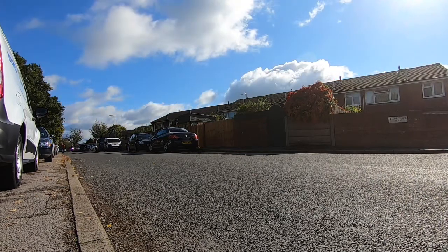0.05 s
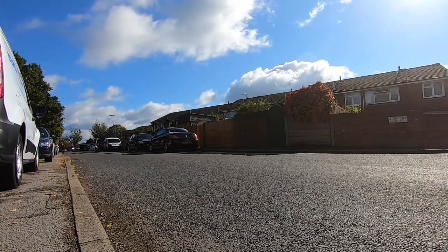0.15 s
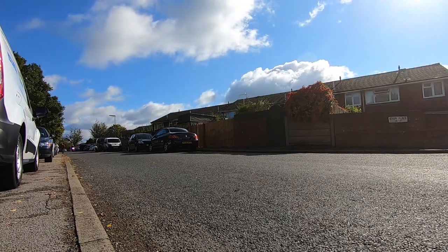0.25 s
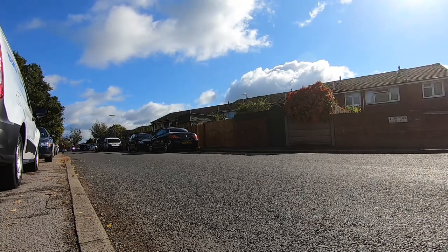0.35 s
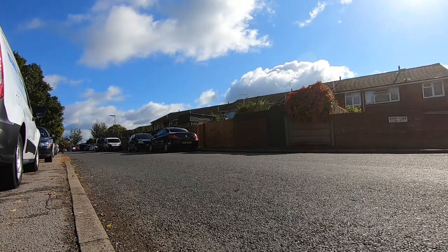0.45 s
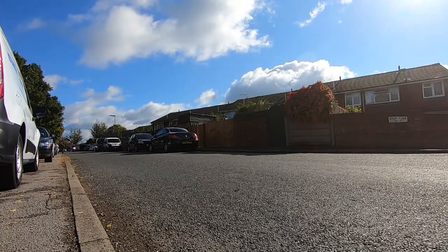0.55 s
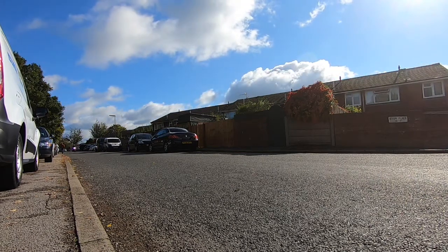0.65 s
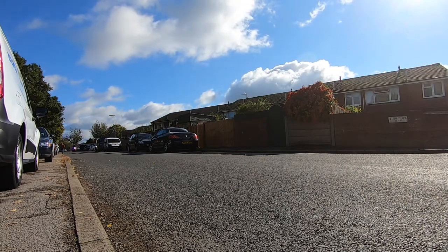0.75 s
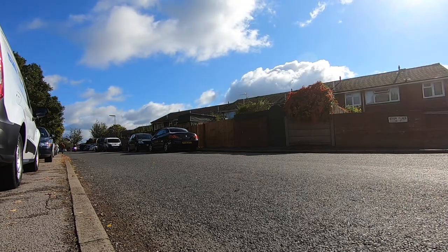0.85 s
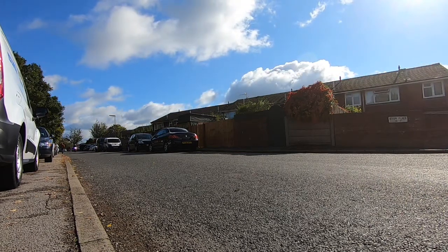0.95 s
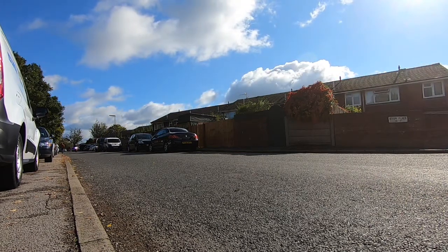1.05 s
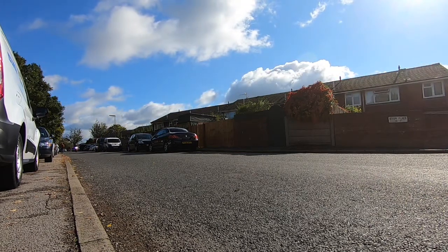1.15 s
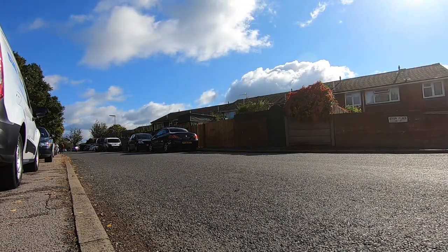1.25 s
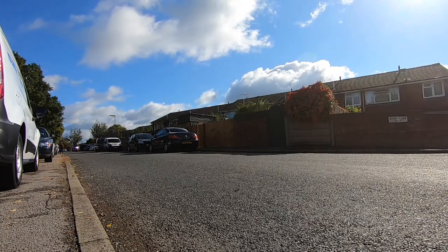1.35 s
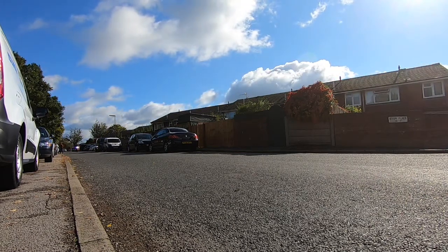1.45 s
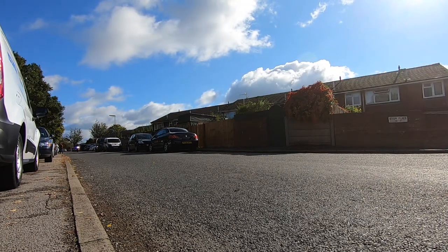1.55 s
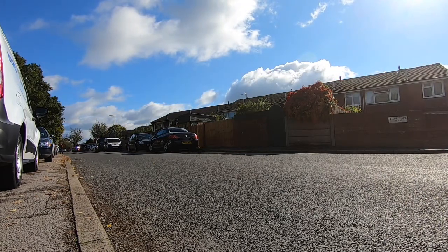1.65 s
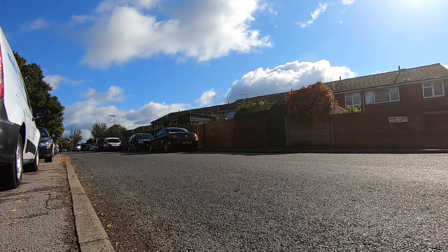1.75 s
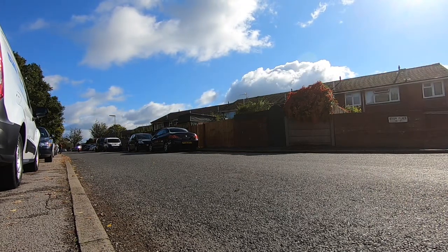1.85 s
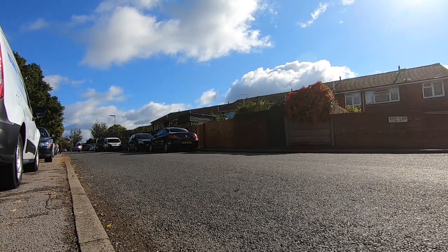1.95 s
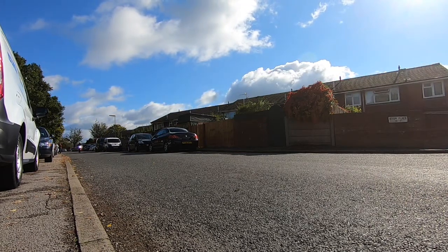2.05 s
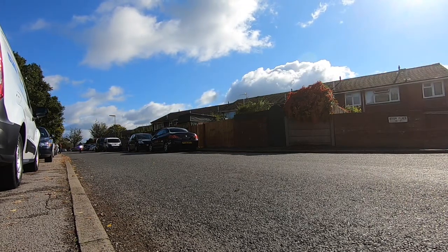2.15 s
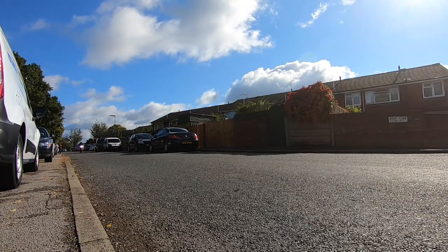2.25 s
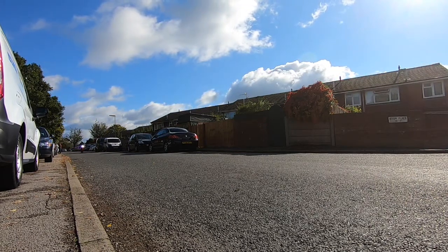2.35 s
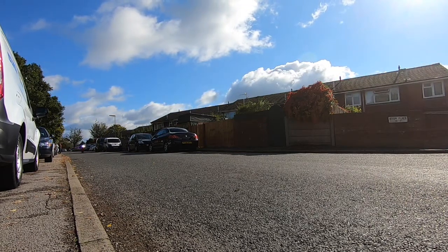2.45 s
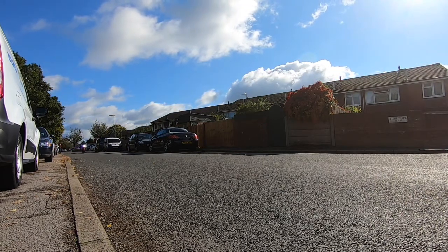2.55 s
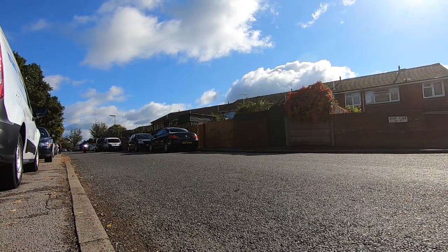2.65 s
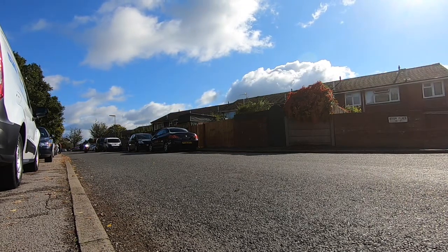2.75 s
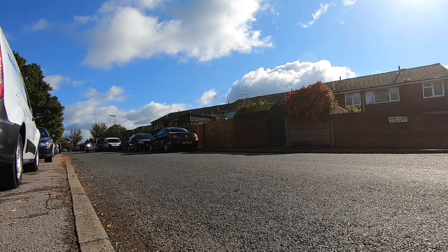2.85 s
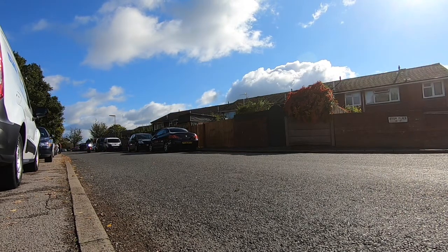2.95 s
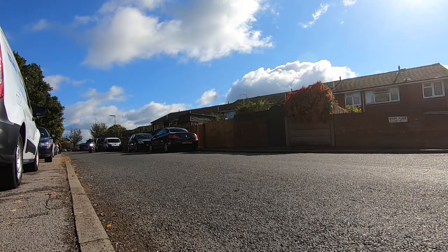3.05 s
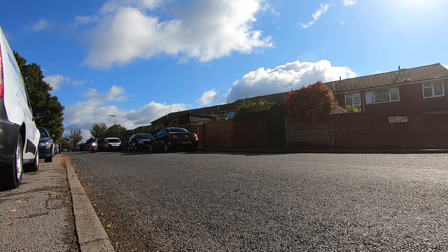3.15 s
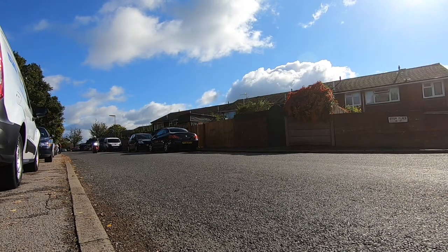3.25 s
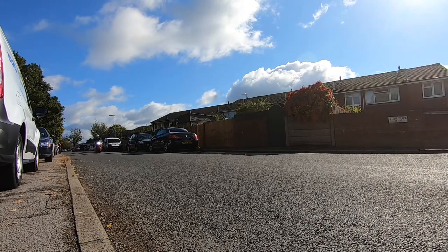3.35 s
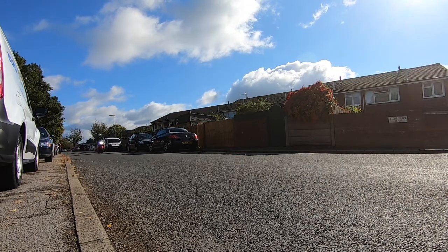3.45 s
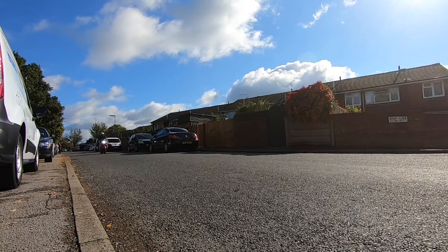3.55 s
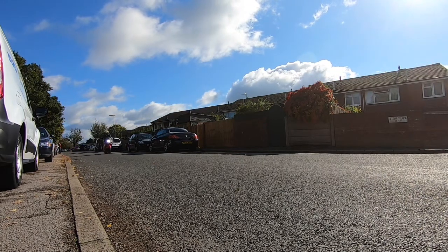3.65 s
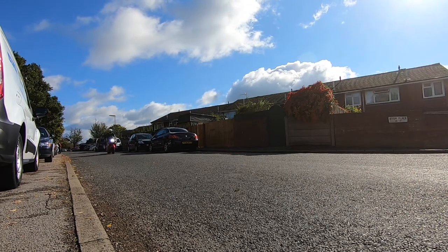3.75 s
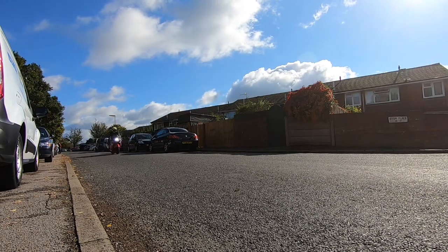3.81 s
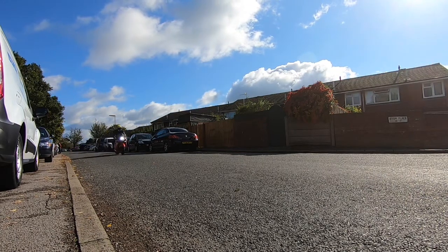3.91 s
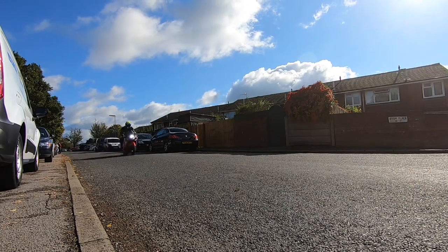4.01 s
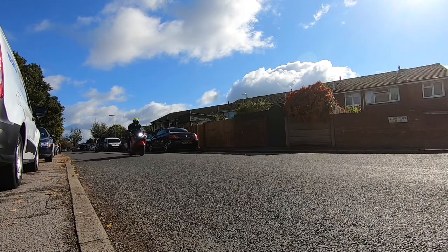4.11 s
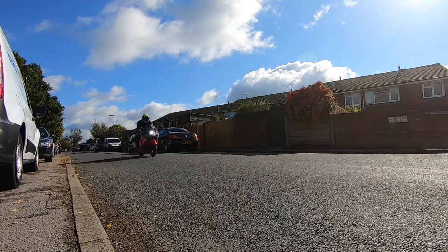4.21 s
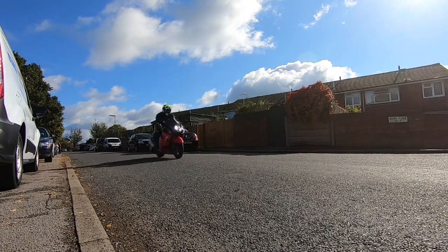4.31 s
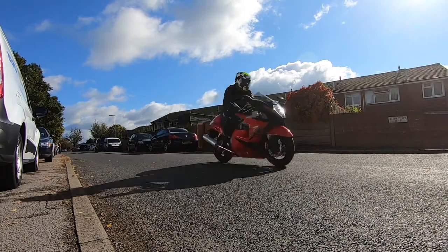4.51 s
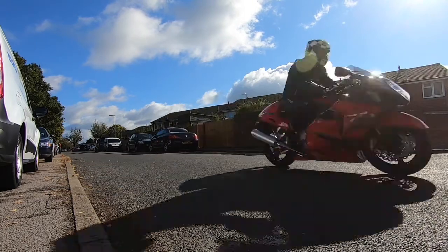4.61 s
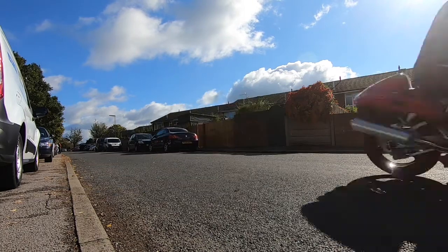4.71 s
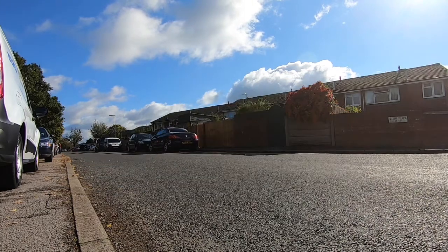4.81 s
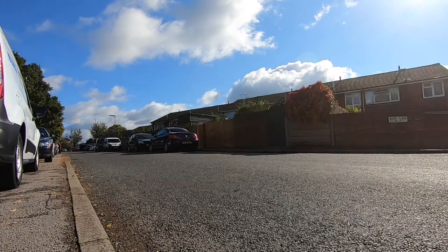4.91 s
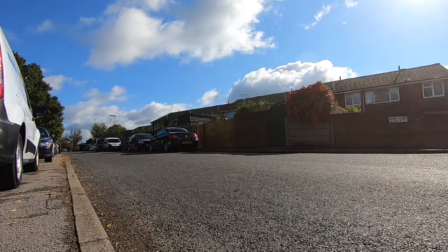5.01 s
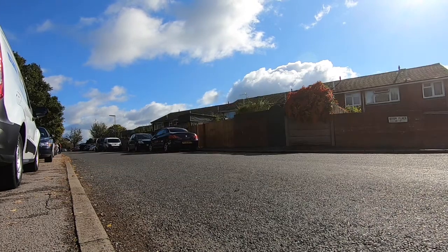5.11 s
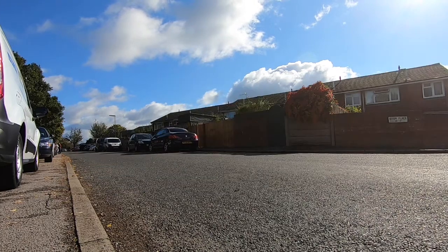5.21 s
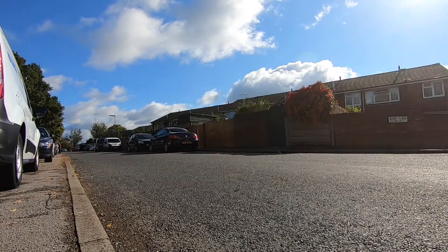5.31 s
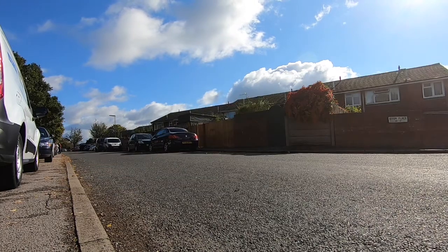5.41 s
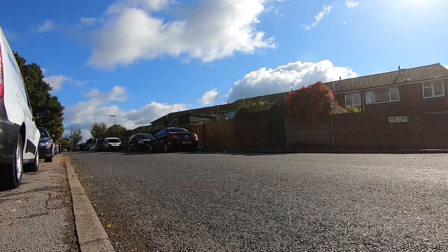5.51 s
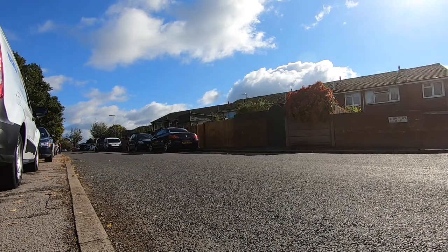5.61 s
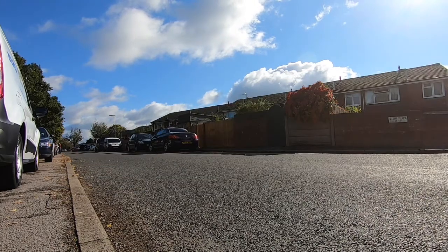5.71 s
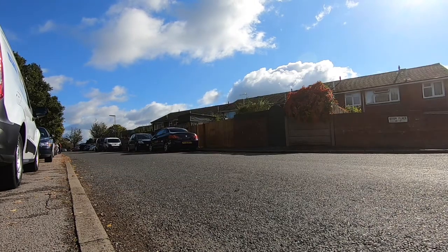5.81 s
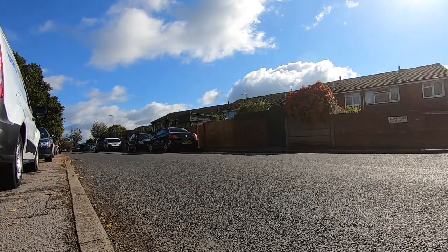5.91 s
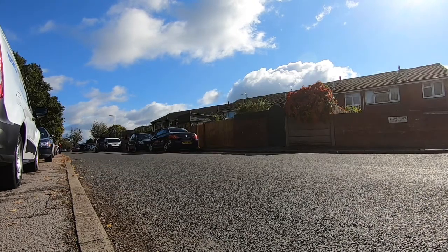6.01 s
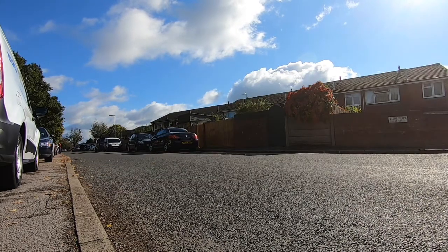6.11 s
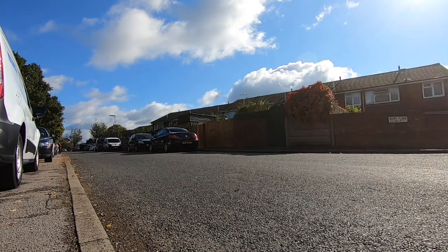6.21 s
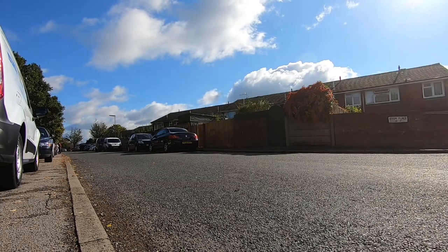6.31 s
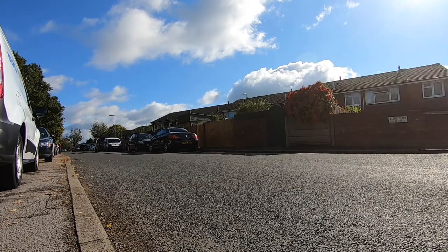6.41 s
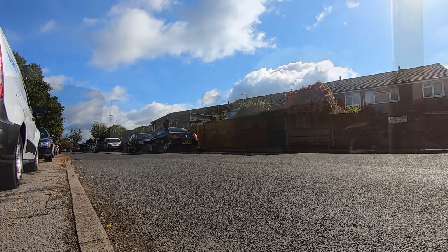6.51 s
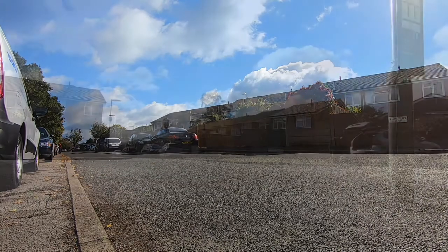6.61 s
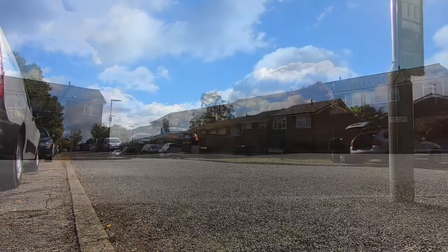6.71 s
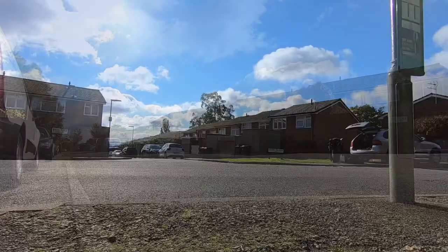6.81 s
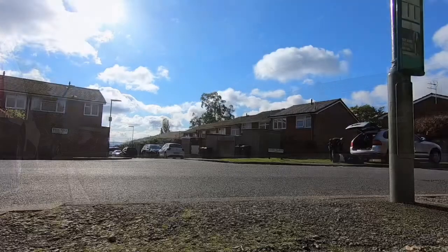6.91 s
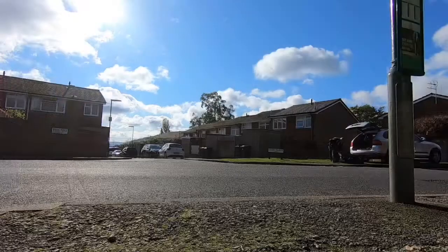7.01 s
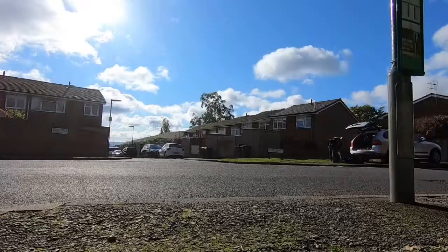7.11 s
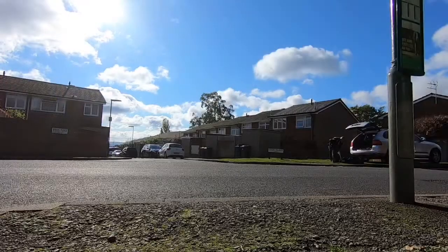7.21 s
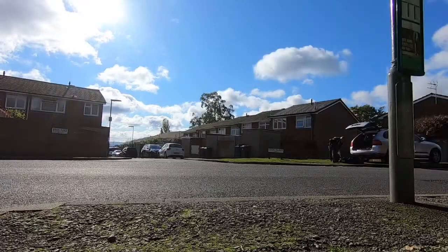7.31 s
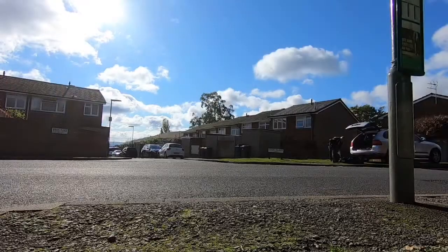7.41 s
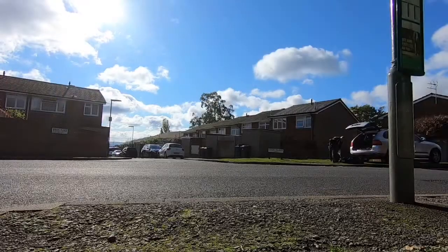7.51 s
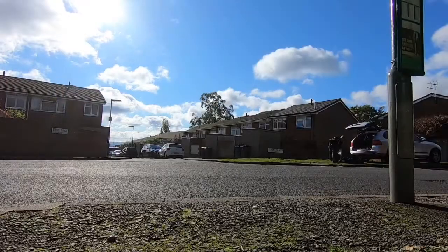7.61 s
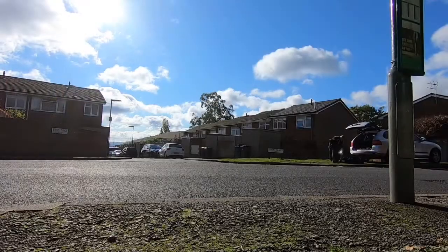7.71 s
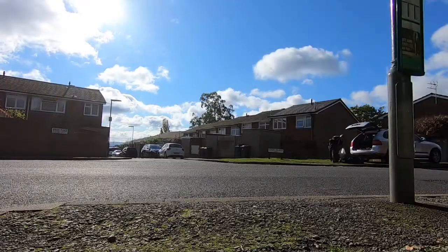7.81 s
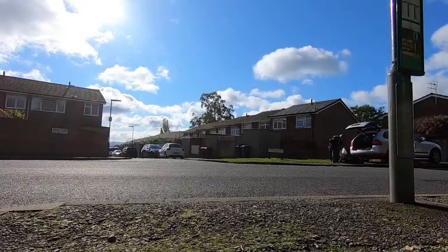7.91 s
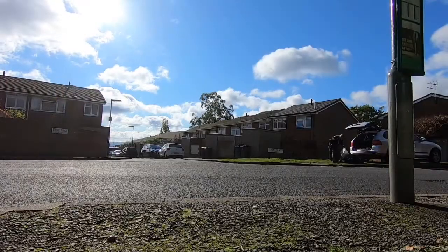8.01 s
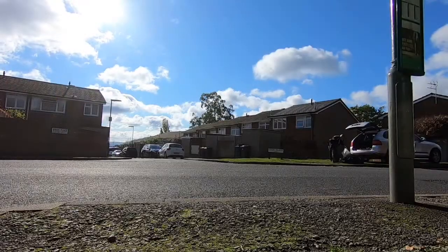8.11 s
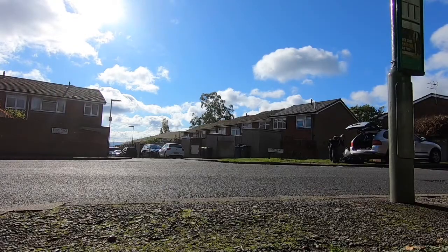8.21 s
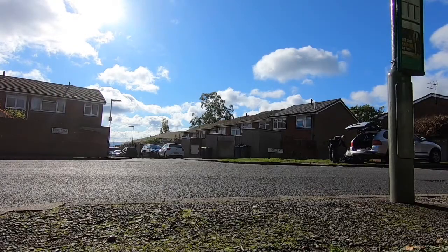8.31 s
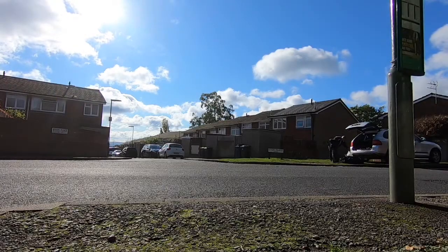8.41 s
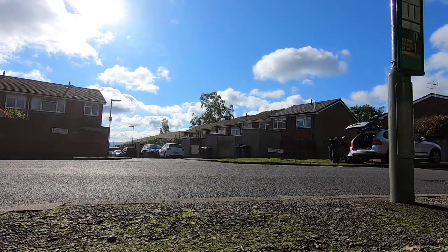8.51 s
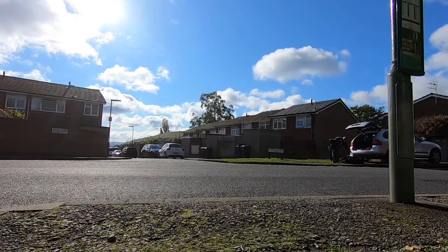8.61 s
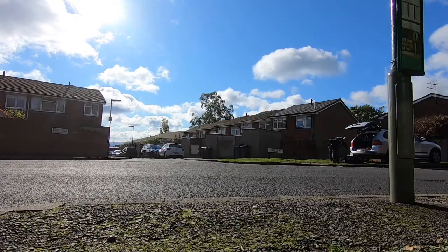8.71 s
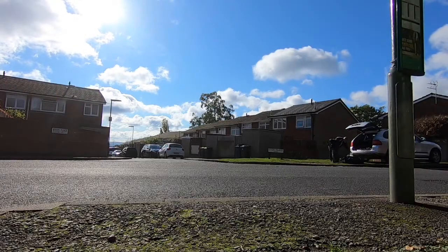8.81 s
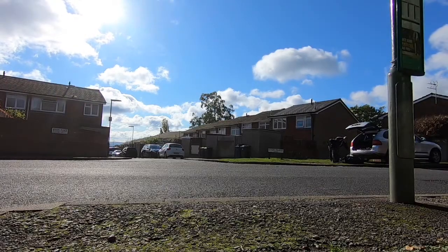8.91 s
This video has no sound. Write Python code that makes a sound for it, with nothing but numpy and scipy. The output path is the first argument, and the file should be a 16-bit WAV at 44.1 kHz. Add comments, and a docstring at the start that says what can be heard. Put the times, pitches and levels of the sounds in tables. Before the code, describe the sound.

Distant motorcycle drone builds to a loud close pass with falling pitch and low exhaust pops, then fades into a slow, thumping idle coming closer.

```python
"""A four-cylinder motorcycle pulls up a residential street: engine multiples, roar noise and pipe rings
build with its drone, over filtered-noise town murmur, a faint fading hum and wind on the microphone ports.
It passes the kerb with falling Doppler pitch and coasts away, throttle shut, the pipe popping as short low rings.
A dissolve leads to a second, quieter spot, where the bike rolls nearer at a lumpy idle: pressure pulses
ring the silencer, over engine hiss and casing rings."""
import sys
import numpy as np
from scipy import signal
from scipy.fft import rfft, irfft
from scipy.io import wavfile
from scipy.ndimage import uniform_filter1d, map_coordinates

SR = 44100
rng = np.random.default_rng(int(sys.argv[2]) if len(sys.argv) > 2 else 0)


def transcribe(u):
    """Save the signal u as a 16-bit wav file named by the first command-line argument.

    u: samples, shape (n,) or (channels, n), limited to [-1, 1]; the rate is SR.
    q: integer samples, one column per channel.
    """
    v = np.clip(np.atleast_2d(u).T, -1, 1)
    q = np.round(v * 32767).astype(np.int16)
    wavfile.write(sys.argv[1], SR, q)


N = 394694

# exhaust drone, swelling and dipping as street reflections add and cancel: (time [s], rms level [dB])
DRONE_LEVEL = [(0, -37.5), (.83, -41.5), (1.02, -35), (1.23, -53), (1.56, -32), (1.86, -38.5), (2.19, -28),
               (2.33, -32.5), (2.38, -40), (2.45, -34), (2.77, -22.5), (2.88, -27.5), (3.21, -20),
               (3.43, -23), (3.48, -36), (3.52, -25), (3.575, -31), (3.65, -23), (3.695, -33), (3.74, -19),
               (3.785, -23), (3.82, -16.5), (3.94, -25), (4, -19.5), (4.1, -25), (4.14, -18), (4.24, -15.5),
               (4.3, -25), (4.39, -18), (4.44, -28), (4.48, -19), (4.62, -15.5), (4.66, -27), (4.71, -16.5),
               (4.76, -17.5), (4.82, -19), (4.93, -14.5), (4.99, -18), (5.05, -14.5), (5.16, -14),
               (5.3, -19.5), (5.65, -29.5), (5.72, -22), (6.07, -25.5), (6.19, -41), (6.3, -26),
               (6.36, -24), (6.41, -45), (6.52, -34), (6.7, -32), (6.9, -29)]
# firings at the engine, pulling up to the kerb spot and then coasting down: (time [s], rate [Hz])
FIRING_RATE = [(0, 91.9), (.65, 93.3), (1.5, 101.4), (2, 107.5), (3, 120.1), (3.5, 125.5), (4, 132.5),
               (4.3, 135.8), (4.56, 137.4), (5, 134.5), (6.95, 100.8)]
# moments when a cylinder misses its firing: (time [s])
MISFIRES = [4.672, 4.747, 4.807, 4.838, 4.996, 5.216, 6.285]
# roar colour from ahead and from behind, relative: (frequency [Hz], density [dB per Hz])
FRONT_COLOUR = [(90, -15), (160, -11.5), (300, -13), (450, -13), (640, -11), (885, -15.5), (1220, -15),
                (1500, -16), (2500, -18.5), (3500, -24.5), (4720, -31.5), (10000, -53.5), (14300, -65.5)]
REAR_COLOUR = [(90, -30), (160, -16), (330, -14.5), (480, -15.5), (790, -16.5), (1360, -19.5),
               (1810, -19.5), (4000, -30.5), (7690, -37.5), (10500, -45), (14300, -68)]
# width of the roar from street echoes, ahead and behind: (frequency [Hz], side minus mid [dB])
FRONT_WIDTH = [(200, -47), (400, -22), (670, -11.5), (1230, -10), (4140, -20), (7570, 2), (13900, -3.5)]
REAR_WIDTH = [(200, -13), (400, -11), (670, -2), (1230, -2), (4140, -6), (7570, 3), (13900, 1)]
# tail pipe rings: (frequency at the bike [Hz], width [Hz], level over roar from ahead [dB], from behind [dB])
PIPE_RINGS = [(594, 75, -14, -4.5), (1168, 70, -19, -8.5), (1735, 70, -26, -30), (2330, 50, -28, -30)]
# a pipe ring stands out or sinks; it barks as the throttle shuts:
# (ring index, time [s], swell [dB], half length [s])
PIPE_SWELLS = [(0, 4.93, 6, .14), (0, 6.35, 2, .2), (0, 6.65, -8, .12), (1, .9, -8, .5), (1, 3, 9, .45),
               (1, 5, 2, .15), (1, 5.9, 4, .15), (1, 6.4, -8, .3), (2, 2.85, 15, .4), (3, 2.65, 15, .35)]
# airy band on the approach: (frequency [Hz], width [Hz], level over roar [dB], time [s], half length [s])
AIRY_BAND = (5700, 500, -26, 2.0, 1.0)
# multiples of the firing rate, in groups: second harmonic, third, cylinder mismatch, intake growl,
# cam chain, gear whine: (multiple, relative level [dB])
TONE_GROUPS = [
    [(2, 0)],
    [(3, 0), (4, -9)],
    [(1.5, -2), (2.5, 0), (2.75, -2)],
    [(4.5, -3), (5, 0), (5.5, -4), (6, -8)],
    [(10, -12), (11, 0)],
    [(25, -12), (25.5, -11), (26, 0), (26.5, -12), (28, -12)],
]
# one row a group: (level against the open level from ahead [dB], from behind [dB], share of car screening)
TONE_LEVELS = [(-8, -5, 0), (-19, -7, 0), (-10, -22, .3), (-11.5, -19, 1), (-25, -26, 1), (-18, -42, 1)]
# a tone group stands out or sinks: (group index, time [s], swell [dB], half length [s])
TONE_SWELLS = [(0, 1.3, 5, .8), (0, 2.15, -8, .2), (0, 3.5, -5, .25), (0, 5.7, 3, .4), (0, 6.3, 7, .5),
               (1, .5, 8, .5), (1, 1.7, 10, .45), (1, 4.72, 6, .07), (1, 5.3, 4, .4), (1, 6.3, -5, .4),
               (2, 1, 4, .25), (2, 3.9, 4, .4), (2, 6.45, 14, .2), (3, 2, 9, .3), (3, 3, 7, .45),
               (3, 4.42, 5, .14), (4, 1.75, 17, .75), (5, .27, 8, .06), (5, .5, 13, .3), (5, .9, 3, .2),
               (5, 2.6, -2, .3), (5, 1.75, 8, .35), (5, 3.35, 5, .3), (5, 4.05, 4, .13), (5, 4.34, 8, .06),
               (5, 4.5, 6, .04), (5, 4.65, 10, .07), (5, 4.77, -10, .05)]
# where the bike is heard, before the port colour in PORT_AIM: (time [s], left minus right [dB])
BEARING = [(0, 7), (1.75, 8), (3.42, 6), (4.38, 1), (4.55, -3), (4.75, -25), (5.05, -11), (5.4, -10),
           (6.9, -12.5)]
# how much the ports favour a side: (frequency [Hz], gain on the lean [dB])
PORT_AIM = [(300, -35.5), (670, -4.5), (1230, 1), (2260, -2), (4140, -5.5), (7570, -10.5), (13900, -34.5)]
# distant town colour, relative: (frequency [Hz], density [dB per Hz])
TOWN_COLOUR = [(12, -34.5), (20, -13), (96, -4), (159, -9.5), (293, -15), (400, -21), (800, -34.5),
               (2200, -42), (4000, -63), (6600, -89.5)]
# town width: (frequency [Hz], side minus mid [dB])
TOWN_WIDTH = [(60, -4), (200, -27.5), (370, -16.5), (670, -3), (3000, 2.5)]
# wind gusts, before their flicker: (time [s], peak [dB], half length [s])
GUSTS = [(.3, -41, 0.5), (0.828, -42, .1), (1.8, -53, 0.12), (2.23, -53, 0.07), (3.587, -51, 0.18),
         (4.818, -43, 0.31), (6.39, -36.5, 0.29)]
# unburnt fuel popping in the pipe: (onset [s], level before POP_GAIN_DB [dB], frequency [Hz], t60 [s])
POPS = [(4.68, -16, 86, 0.093), (4.726, -9, 77, 0.085), (4.787, -11.5, 94, 0.1), (4.808, -10, 85, 0.062),
        (4.843, -10.5, 81.5, 0.086), (4.915, -14, 91, 0.15), (4.991, -14, 72, 0.1), (5.21, -25, 71, 0.24),
        (6.2, -30, 70.4, 0.16), (6.252, -23, 75.4, 0.12), (6.37, -25, 66, 0.16)]
# runs of good firings at idle: (first firing [s], last firing [s], relative strength [dB])
IDLE_RUNS = [(6.635, 6.764, -27), (6.847, 6.967, -20.5), (7.047, 7.304, -23), (7.361, 7.516, -19.5),
             (7.574, 7.631, -17.5), (7.68, 7.727, -16), (7.786, 7.943, -17), (8, 8.053, -15.5),
             (8.109, 8.16, -17), (8.219, 8.354, -16), (8.402, 8.455, -15), (8.543, 8.7, -16.5),
             (8.764, 8.89, -13.5)]
# silencer resonances: (frequency [Hz], width [Hz], relative level [dB])
SILENCER_RINGS = [(40.8, 110, -23), (78.6, 34.6, 4), (122, 42, -7.5)]
# idle hiss colour, relative: (frequency [Hz], density [dB per Hz])
IDLE_COLOUR = [(110, -23), (180, 3), (280, -9.5), (400, -7), (838, -8.5), (1100, -9), (1350, -15),
               (1950, -15), (4600, -28.5), (10300, -35), (14300, -40)]
# casing rings at idle: (frequency [Hz], width [Hz], level over hiss before the nearing gain [dB])
CASING_RINGS = [(220, 22, -4.5), (328, 16, -2), (626, 60, -5.5), (983, 55, -7), (1970, 180, -15)]
# colour of the microphone ports: (frequency [Hz], gain [dB])
PORT_COLOUR = [(4700, 0), (6200, -1.5), (7400, 0), (8700, -1.5), (9900, 2), (11000, -1.5)]

ABEAM_S, TURN_S = 4.77, 0.04  # the colour turns from ahead to behind
SPEED_M_S, SOUND_M_S = 17, 343
PIPE_PASSES_S, PIPE_M, GEARS_PASS_S = 4.7, 1.4, 4.735
PIPE_GLIDE_M = 9  # echoes stretch the pipe's pitch drop
ENGINE_PASSES_S, ENGINE_M = 4.52, 4.0  # the roar comes from the whole machine, so it peaks more broadly
OPEN_DB, COASTING_DB, ROAR_TRIM_DB = -10, -4.5, 0.53  # open level at 1 m; loss with throttle shut; roar gain
SPREAD_DB = -18  # loss for ten times the distance; house fronts keep the sound in the street
SCREEN_M, SCREEN_DB_PER_M = 29.1, -0.2747  # parked cars hide the bike beyond this distance
FRONT_TREBLE_DB, REAR_TREBLE_DB = -2.0, -6.5  # far treble shelf
NEAR_TREBLE_DB, BRIGHT_M = 8.5, 5.2  # treble gain close to the pipe, and its reach
DISSOLVE_S, DISSOLVE_DB_PER_S = 6.4, -12.5
LAG_SAMPLES, IDLE_LAG_SAMPLES = .7, 1.5  # the left port hears late once the bike is on the right
TOWN_DB, BREEZE_DB = -39, -57.5
POP_GAIN_DB = 4.5
IDLE_HZ, IDLE_PAN_DB, WEAK_DB = 38.7, -8, -10  # nominal firing rate; pan; weak firings between the runs
IDLE_REF_S, IDLE_DB, IDLE_DB_PER_S = 7.2, -46, 2  # hiss at the reference time, and growth as it nears
IDLE_TREBLE_DB, IDLE_TREBLE_DB_PER_S = -8, 3.5
SUCK, SUCK_S = 0.38, 0.0068  # the silencer draws air back just before each idle blow (share, lead)
TOP_HZ = 14200


def undb(db):
    """Turn decibels into an amplitude factor."""
    return 10 ** (np.asarray(db) / 20)


def unit(x):
    """Scale to rms 1."""
    return x / np.sqrt(np.mean(x ** 2))


def curves(table):
    """Columns of a time table, one value a sample."""
    s, *columns = np.transpose(table)
    return [np.interp(np.arange(N) / SR, s, c) for c in columns]


def shape(table):
    """Gain on every FFT bin from (frequency [Hz], gain [dB]) points."""
    hz, db = np.transpose(table)
    bins = np.fft.rfftfreq(N, 1 / SR) + 1
    return undb(np.interp(np.log(bins), np.log(hz), db))


def hiss(colour, width, treble_db=0.):
    """Stereo noise with mid rms 1, then a treble shelf: air takes the treble, the top octave more."""
    spectrum = rfft(rng.standard_normal((2, N))) * shape(colour)
    spectrum[1] *= shape(width)
    mid, side = irfft(spectrum, N)
    both = np.array([mid + side, mid - side]) / np.std(mid)
    for split_hz, share in (4600, 0.94), (10500, 1.0):
        lowpass = signal.butter(3, split_hz, fs=SR, output="sos")
        low = signal.sosfiltfilt(lowpass, both)
        both = low + (both - low) * undb(share * treble_db)
    return both


def ring(x, hz, width):
    """Two-pole resonance, gain 1 at the centre."""
    return signal.lfilter(*signal.iirpeak(hz, hz / width, fs=SR), x)


def walk(rate):
    """Random levels held 1 / rate s and slewed twice; spread near 1."""
    k = int(SR / rate)
    held = np.repeat(rng.standard_normal(N // k + 1), k)
    return 1.62 * uniform_filter1d(uniform_filter1d(held, k), k)[:N]


def bump(s, half):
    """A smooth swell, 1 at time s and 1/e at half either side."""
    return np.exp(-((np.arange(N) / SR - s) / half) ** 2)


def whistle(hz, width):
    """Narrow noise round a moving centre, rms 1."""
    slow = signal.lfilter(*signal.butter(2, width / 2, fs=SR), rng.standard_normal((2, N)))
    phase = 2 * np.pi * np.cumsum(hz) / SR
    return unit(slow[0] * np.cos(phase) + slow[1] * np.sin(phase))


def partials(turns, table, flutter_db, rate, wobble):
    """Multiples of a turning phase, each fluttering in level and phase along the street."""
    total = 0
    for multiple, db in table:
        level = undb(db + flutter_db * walk(rate))
        total = total + level * np.sin(2 * np.pi * (multiple * turns + wobble * walk(rate)))
    return unit(total)


def aim(both, pan_db, lag):
    """The ports favour the side of the source, most in the middle frequencies; the left may lag."""
    lean = np.tanh(pan_db * np.log(10) / 40) * irfft(rfft(both) * shape(PORT_AIM), N)
    left, right = both + lean * np.array([[1], [-1]])
    return np.array([map_coordinates(left, [np.arange(N) - lag], mode="nearest"), right])


def doppler(passes_s, miss_m):
    """Stretch of the sound's period by the bike's speed towards or away from the ear."""
    along = SPEED_M_S * (np.arange(N) / SR - passes_s)
    return 1 + SPEED_M_S / SOUND_M_S * along / np.hypot(along, miss_m)


def firing_phase(passes_s):
    """Firings counted at the ear, Doppler included."""
    return np.cumsum(curves(FIRING_RATE)[0] / doppler(passes_s, PIPE_M)) / SR


def exhaust_drone(turns, screen_db):
    """A sine at the firing rate with a trembling phase; missed firings leave holes."""
    cycle = turns + 0.045 * walk(13)
    missed_cycles = np.floor(cycle[(np.array(MISFIRES) * SR).astype(int)])
    missed = np.isin(np.floor(cycle), missed_cycles)
    fired = uniform_filter1d(1 - 0.97 * missed, size=90)
    flicker = undb(.12 * screen_db * walk(8) + .8 * walk(10))  # more while hidden
    level = np.sqrt(2) * undb(curves(DRONE_LEVEL)[0])
    return level * fired * flicker * np.sin(2 * np.pi * cycle)


def pipe_rings(behind):
    """Narrow noise at the tail pipe's resonances, gliding down in pitch past the ear."""
    glide = doppler(PIPE_PASSES_S, PIPE_GLIDE_M)
    waver = 1 + .005 * walk(4)
    total = 0
    for k, (hz, width, ahead, back) in enumerate(PIPE_RINGS):
        swell_db = sum(db * bump(s, half) for n, s, db, half in PIPE_SWELLS if n == k)
        level = undb(ahead + (back - ahead) * behind + swell_db + walk(4.94))
        total = total + level * whistle(hz * waver / glide, width)
    return total


def engine_roar(turns, behind, roar_db):
    """Noise turning from intake to exhaust colour, with pipe rings and an airy band, puffed each firing."""
    along = SPEED_M_S * (np.arange(N) / SR - PIPE_PASSES_S)
    near_db = NEAR_TREBLE_DB * BRIGHT_M / np.hypot(along, BRIGHT_M)
    front = hiss(FRONT_COLOUR, FRONT_WIDTH, FRONT_TREBLE_DB + near_db)
    rear = hiss(REAR_COLOUR, REAR_WIDTH, REAR_TREBLE_DB + near_db)
    hz, width, db, s, half = AIRY_BAND
    airy = undb(db) * bump(s, half) * whistle(np.full(N, hz), width)
    roar = np.sqrt(1 - behind) * front + np.sqrt(behind) * rear + pipe_rings(behind) + airy
    puffs = 1 + 0.034 * np.cos(2 * np.pi * turns)  # gas puffs once a firing
    return roar * undb(roar_db + ROAR_TRIM_DB) * puffs


def engine_tones(behind, open_db, screen_db):
    """Multiples of the firing rate, smeared more the higher they lie as the crank speed trembles."""
    t = np.arange(N) / SR
    turns = firing_phase(GEARS_PASS_S)
    depth = np.interp(t, [1, 1.5, 4, 4.4, 4.65], [.009, .004, .004, .006, .011])
    tremble = turns + depth * walk(30)
    levels = [open_db + ahead + (back - ahead) * behind + share * screen_db + .7 * walk(4)
              for ahead, back, share in TONE_LEVELS]
    for group, s, db, half in TONE_SWELLS:
        levels[group] = levels[group] + db * bump(s, half)
    tones = sum(undb(db) * partials(tremble, group, flutter_db=1.8, rate=9, wobble=.08)
                for db, group in zip(levels, TONE_GROUPS))
    # side tones of the whine come up as the gearbox turns side-on
    whine_db = levels[5]
    sideband_db = whine_db + np.interp(t, [3.9, 4.3, 4.55, 4.65], [-10, 1, 2, -4])
    side_tones = [(22, -9), (24, -11), (27, 0), (30, -15)]  # (multiple, relative level [dB])
    tones = tones + undb(sideband_db) * partials(tremble, side_tones, flutter_db=3.0, rate=18, wobble=.1)
    # gear teeth rattle: a rough halo round the whine
    rattle = unit(signal.lfilter(*signal.butter(2, 220, fs=SR), rng.standard_normal(N)))
    rattle_db = whine_db + np.interp(t, [.8, 1.6, 3.6, 4.3], [2, 0, 0, 3])
    return tones + undb(rattle_db) * rattle * np.sin(2 * np.pi * 26 * turns)


def passing():
    """Drone, roar and tones of the passing bike, set by distance, car screening and the side it shows."""
    t = np.arange(N) / SR
    behind = 1 / (1 + np.exp((ABEAM_S - t) / TURN_S))
    metres = np.hypot(SPEED_M_S * (t - ENGINE_PASSES_S), ENGINE_M)
    open_db = OPEN_DB + SPREAD_DB * np.log10(metres) + COASTING_DB * behind
    open_db = open_db + DISSOLVE_DB_PER_S * np.maximum(t - DISSOLVE_S, 0)
    screen_db = SCREEN_DB_PER_M * np.maximum(metres - SCREEN_M, 0) * (1 - behind)
    turns = firing_phase(PIPE_PASSES_S)
    drone = exhaust_drone(turns, screen_db)
    roar = engine_roar(turns, behind, open_db + screen_db)
    tones = engine_tones(behind, open_db, screen_db)
    fade = np.clip((6.9 - t) / 0.35, 0, 1)
    return fade * (aim(roar + tones, curves(BEARING)[0], LAG_SAMPLES * behind) + drone)


def outdoors():
    """Town murmur, a far hum that fades, and wind that rumbles on each port partly on its own."""
    t = np.arange(N) / SR
    town = undb(TOWN_DB + .7 * walk(1.5)) * hiss(TOWN_COLOUR, TOWN_WIDTH)
    hum = undb(-55.0 - 20 * t + 3 * walk(12)) * np.sin(2 * np.pi * 800 * t)
    wind_colour = [(12, -32), (22, 5.5), (40, 11.5), (65, 12.0), (120, 10.5), (300, -57.0)]
    wind = hiss(wind_colour, [(20, -7.5), (100, 0.0)])
    gusts = undb(BREEZE_DB) + sum(undb(db) * bump(s, half) for s, db, half in GUSTS)
    sheltered_db = np.interp(t, [6.6, 6.95], [0, -5])  # the second spot is quieter
    return undb(sheltered_db) * town + hum + gusts * undb(2.5 * walk(10)) * wind


def pops():
    """Each pop is a short low ring of the pipe with a rough edge."""
    out, t = np.zeros(N), np.arange(SR // 3) / SR
    for s, db, hz, t60 in POPS:
        swell = (1 - np.exp(-t / 0.0043)) * np.exp(-np.log(1000) * t / t60)
        rough = unit(ring(ring(rng.standard_normal(len(t)), 255, 260), 255, 260))
        pop = swell * (np.sin(2 * np.pi * hz * t) + 0.2 * rough)
        out[int(s * SR):][:len(t)] += undb(db + POP_GAIN_DB) * pop
    return out


def idle_thump():
    """Runs of good firings and weak ones between them push air through the silencer's resonances."""
    times, sizes = [], []
    resumes = [r[0] for r in IDLE_RUNS[1:]] + [N / SR + 0.0078]
    for (first, last, db), resume in zip(IDLE_RUNS, resumes):
        run = np.linspace(first, last, round((last - first) * IDLE_HZ) + 1)
        gap = np.linspace(last, resume, round((resume - last) * IDLE_HZ) + 1)[1:-1]
        times += [*run, *gap]
        sizes += [db] * len(run) + [db + WEAK_DB] * len(gap)
    time_chance, size_chance = rng.standard_normal((len(times), 2)).T
    starts = np.array(times) - .006 + .0005 * time_chance
    blows = np.zeros(N)
    blows[(starts * SR).astype(int)] = undb(np.array(sizes) + .9 * size_chance)
    push = np.hanning(int(0.0099 * SR))
    blows = np.convolve(blows, push / push.sum())[:N]
    blows = blows - SUCK * np.roll(blows, -int(SUCK_S * SR))
    return undb(48) * sum(undb(db) * ring(blows, hz, width) for hz, width, db in SILENCER_RINGS)


def idling():
    """The idle's thumps, with engine hiss and casing rings that grow as the bike nears."""
    t = np.arange(N) / SR - IDLE_REF_S
    hiss_db = IDLE_DB + IDLE_DB_PER_S * t
    treble_db = IDLE_TREBLE_DB + IDLE_TREBLE_DB_PER_S * t
    casing = 0
    for hz, width, db in CASING_RINGS:
        level = undb(db + 1.5 * walk(14) + 1.5 * walk(3))
        casing = casing + level * unit(ring(rng.standard_normal(N), hz, width))
    # the casing stands out more as the bike nears, like the treble
    engine = hiss(IDLE_COLOUR, REAR_WIDTH, treble_db) + undb(treble_db) * casing
    engine = aim(engine, IDLE_PAN_DB, IDLE_LAG_SAMPLES)
    fade_in = np.clip((t + 0.73) / 0.4, 0, 1)
    return idle_thump() + fade_in * undb(hiss_db + 0.98 * walk(5.4)) * engine


def scene():
    """Sum the passing bike, the outdoors, the pops and the idle."""
    return passing() + outdoors() + pops() + idling()


def record(dry):
    """The ports colour the treble, the sound opens softly and a steep filter cuts the top."""
    dry = irfft(rfft(dry) * shape(PORT_COLOUR), N)
    dry = dry * np.clip(np.arange(N) / (.004 * SR), 0, 1)
    return signal.sosfilt(signal.ellip(12, .2, 80, TOP_HZ, fs=SR, output="sos"), dry)


dry = scene()
out = record(dry)
transcribe(out)
```